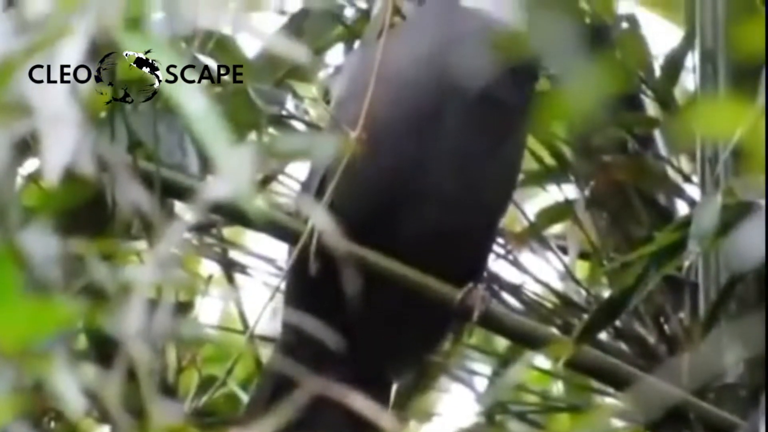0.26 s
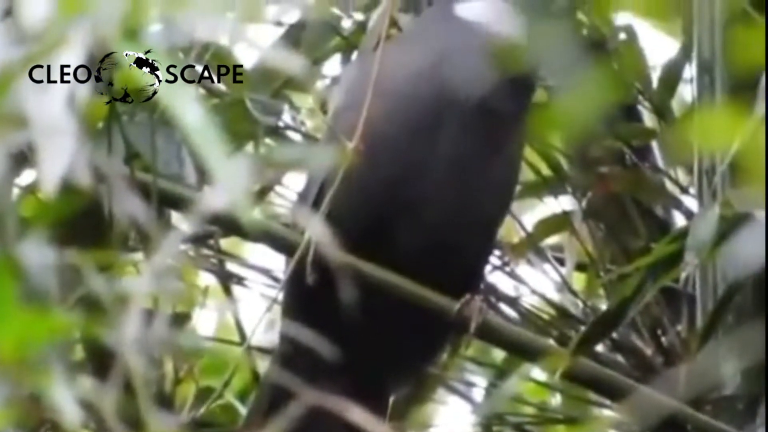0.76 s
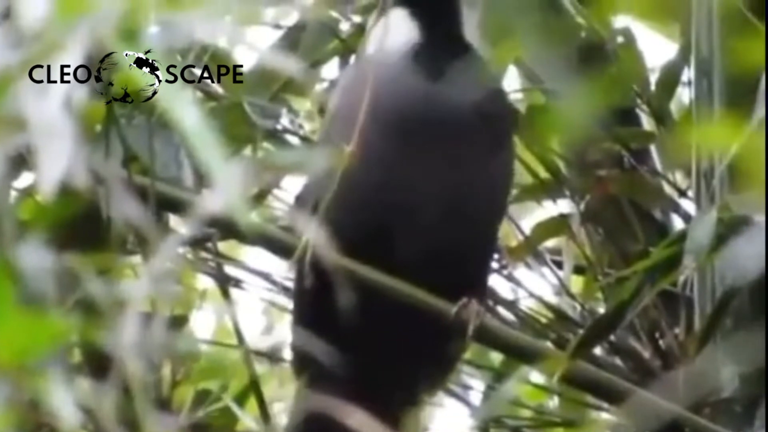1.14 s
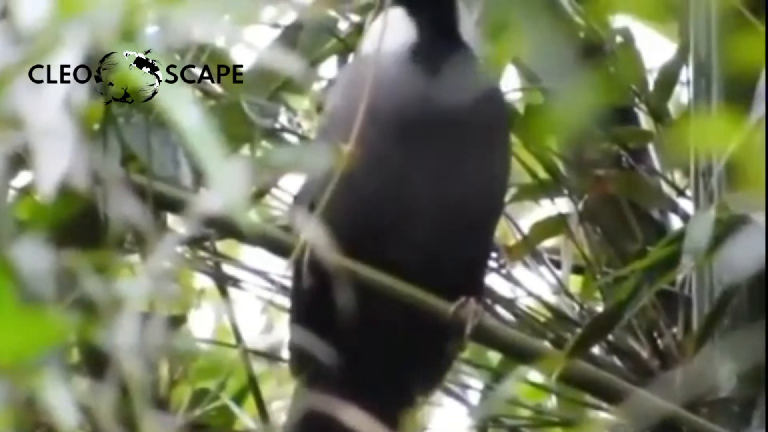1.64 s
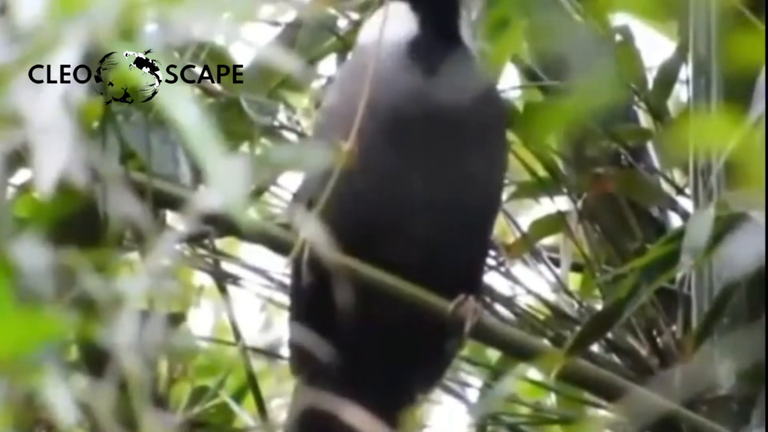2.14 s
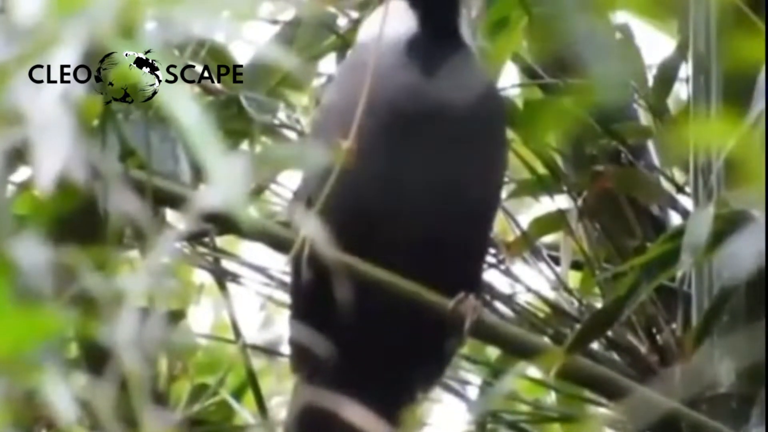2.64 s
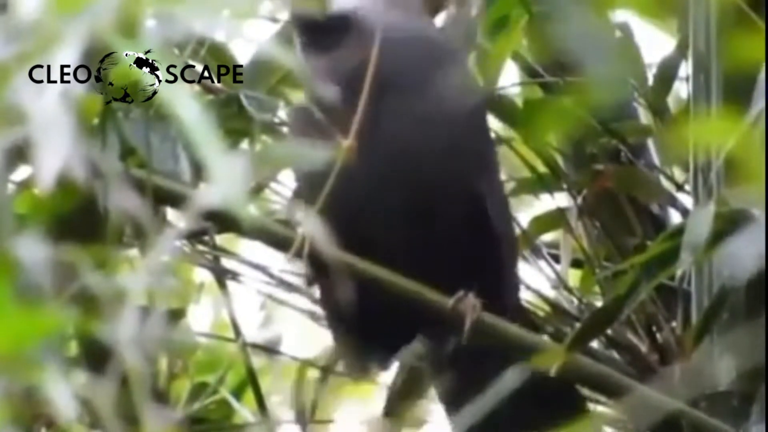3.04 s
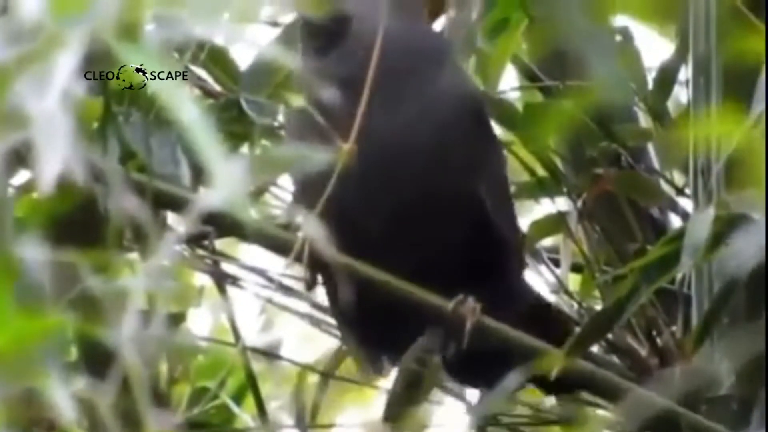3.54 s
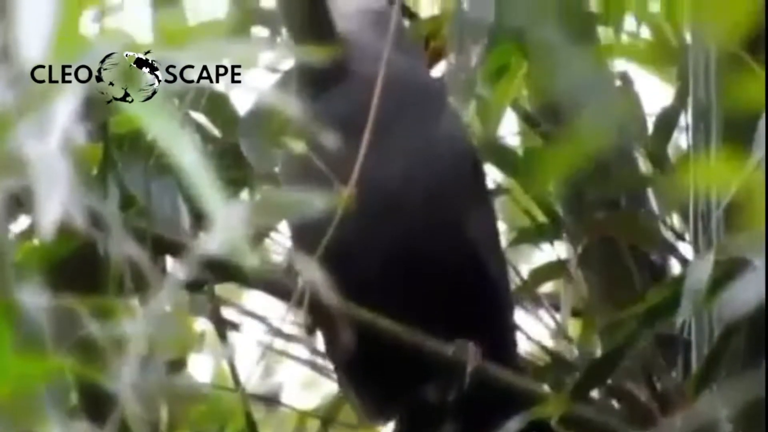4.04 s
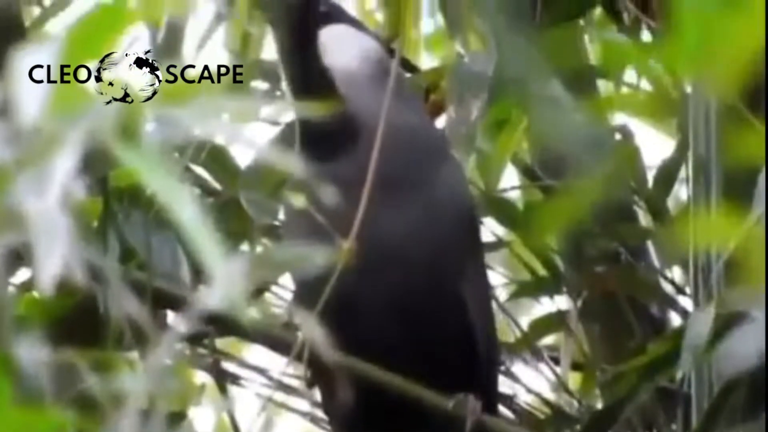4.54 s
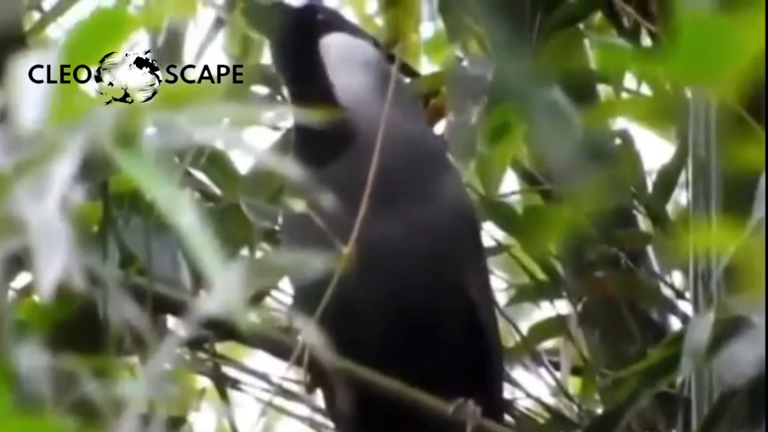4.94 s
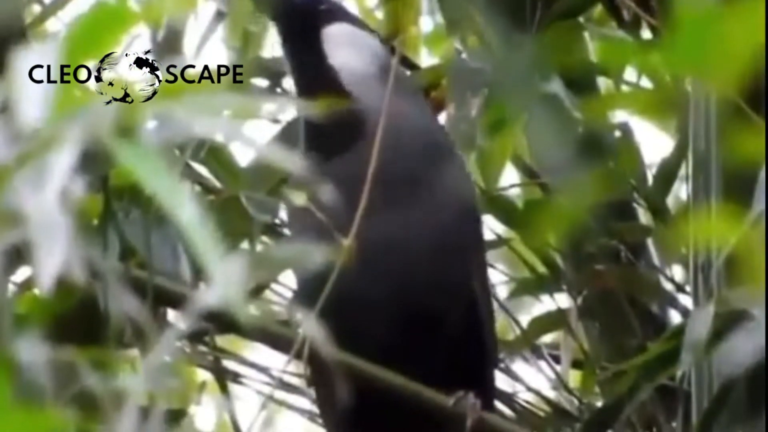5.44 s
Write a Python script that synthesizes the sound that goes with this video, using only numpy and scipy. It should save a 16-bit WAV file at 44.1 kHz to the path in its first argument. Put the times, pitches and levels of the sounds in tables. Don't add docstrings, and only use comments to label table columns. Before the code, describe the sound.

Dense woodland, stereo camera microphone, close song. One strong swooping whistle, a pause, evenly spaced harsh up-and-down chirps, then rapid hollow piping on one pitch that drops as it tires. Scratchy rising notes follow, interleaved with a second bird's steady nasal arches, slightly left or right of centre. Both end in quick overlapping warbles and falls. Tiny far birds, soft traffic rumble and leaf hiss lie beneath.

```python
import sys
import numpy as np
from scipy import signal
from scipy.fft import rfft, irfft
from scipy.io import wavfile
from scipy.ndimage import uniform_filter1d

SR = 44100
rng = np.random.default_rng(int(sys.argv[2]) if len(sys.argv) > 2 else 0)


def to_linear_factor(level_db):
    exponent = np.asarray(level_db, float) / 20
    return 10 ** exponent


def transcribe(u):
    v = np.clip(np.atleast_2d(u).T, -1, 1)
    q = np.round(v * 32767).astype(np.int16)
    wavfile.write(sys.argv[1], SR, q)


N = 250929

# start_s, level_db, pitch_hz, length_s
PIPES = [
    (2.271, -22, 999, 0.032),
    (2.338, -11.5, 998, 0.039),
    (2.414, -11.5, 1000, 0.04),
    (2.493, -12, 1000, 0.041),
    (2.57, -11.5, 1000, 0.04),
    (2.647, -13.5, 988, 0.044),
    (2.731, -12.5, 997, 0.046),
    (2.818, -11.5, 985, 0.037),
    (2.912, -14, 963, 0.0355),
    (3.004, -19, 870, 0.034),
]
# time_s, pitch_hz, level_db
UNDERTONE = [(.1, 1180, -31), (.2, 1316, -25), (.23, 1357, -16.5), (.262, 1335, -28), (.3, 1400, -55)]
# begin_s, crest_s, end_s, rate_hz, depth (0-1)
TRILLS = [
    (4.856, 4.993, 5.06, 48.05, 0.17),
    (5.261, 5.371, 5.45, 47.44, .19),
]
# centre_hz, width_hz, lift_db
THROAT = [(2140, 340, 0), (3730, 113, 7.5), (4820, 2900, -0.5)]
# frequency_hz, level_db
BREATH = [(600, -41), (1000, -7), (2000, -8.5), (4500, -5.5), (7000, -14), (15000, -24)]
# centre_hz, width_hz, lift_db
BREATH_PEAKS = [(2500, 2500, 9.5), (2394, 250, 0), (3760, 770, 12.5), (4200, 250, 6.5), (5800, 880, 11),
                (8300, 680, 12.5), (11850, 1200, 9.5)]
# centre_hz, width_hz, lift_db
BEAK = [(7200, 1200, 22), (13500, 2500, 10)]

# start_s, length_s, low_hz, top_hz, effort_db. The shape stretches to the length.
WHISTLE = [(0, 0.05, -12, -19), (.034, 0.04, -7.5, -14.5), (.094, 0.44, -7.5, 3), (.128, .62, 1, -8),
           (.19, 0.87, 2, -17), (.225, 0.99, -4.5, -7.5), (.26, 0.98, -5.5, -9), (.3, 1, -5.5, -8.5),
           (.326, 0.85, 0, -5.5), (.35, .65, -4, -5), (.39, 0.33, -6, -6), (.422, 0.11, -5.5, -16),
           (.444, .02, -5.5, -10), (.465, 0.01, -19, -32.5)]
WHISTLES = [
    (0.0014, 0.463, 963, 2008, -7),
]
LEAD = [(0, 0.47, -20, -20.5), (.008, .61, -2, -8), (.047, 0.99, 3, 1.5), (.06, 0.78, -4.5, -0.5),
        (.079, .55, 2.5, 4.5), (.101, 0.32, -0.5, -6), (.119, 0.0063, -6.5, -1)]
LEADS = [
    (0.694, .119, 902, 1690, -26),
]
CHAT = [(0, .2, -7, -17), (.008, .42, -2.5, -7.5), (.014, .57, -3, -2), (.028, .76, -5.5, -5),
        (.041, 0.94, 3, -3.5), (.052, .98, 6, -1), (.064, .81, 3, -1.5), (.086, .53, 0, 4),
        (.1, .42, 5, 1.5), (.12, 0.069, 0, -1.5)]
CHATS = [
    (0.909, 0.12, 873, 1654, -27.5),
    (1.128, .12, 867, 1684, -27),
    (1.359, 0.113, 866, 1767, -27.5),
]
LATE_CHAT = [(0, 0.177, -4, -18), (.01, .48, -2, -3), (.023, .82, -1, -7), (.034, 0.99, 0, -12),
             (.046, 0.96, 7, -14), (.058, .8, 2, -5.5), (.069, .57, -2, 3.5), (.079, .47, -0.5, 0.5),
             (.095, 0.33, 1.5, 2.5), (.112, 0.094, -1, -3)]
LATE_CHATS = [
    (1.589, .112, 785, 1800, -26.5),
    (1.811, .1, 756.4, 1804, -26.5),
]
DROP = [(0, 1, -1, -18.5), (.02, 0.79, 4, 0.5), (.046, 0.202, -1, 4), (.064, 0.0085, -11, -6)]
DROPS = [
    (5.138, .056, 1050, 1570, -24),
    (5.539, 0.06, 1053, 1542, -22.5),
]
CHIP = [(0, 0.98, -3, -17), (.006, 0.9, 2, 6.5), (.018, .4, 5.5, 6.5), (.028, 0.0092, 3, -9)]
CHIPS = [
    (4.755, 0.0433, 1144, 1224, -35),
]
HUM = [(0, 0.99, -5, -0.5), (.012, 0.752, -5, 6), (.03, 0.328, -3, 3.5), (.06, .12, 2.5, 0),
       (.082, 0.023, 0, 4.5), (.1, 0.01, -10, -17)]
HUMS = [
    (4.793, 0.1, 940, 1103, -28),
    (5.6, 0.072, 1010, 1070, -37),
]
WARBLE = [(-.015, .01, -20, -28), (.005, 0.03, -3, -7.5), (.05, 0.015, -7.5, -10), (.092, 0.48, -5, -8),
          (.138, .94, -3.5, 5.5), (.16, 0.94, -5, 0), (.18, 0.85, -5, 0)]
WARBLES = [
    (4.864, .195, 950, 1918, -23.5),
]
LATE_WARBLE = [(0, 0.036, -6.5, -17), (.05, 0.0053, -1.5, -14), (.092, 0.41, 1.5, -12.5),
               (.138, .94, -1, 4.5), (.16, 0.96, -8, 5.5), (.18, 0.99, -6.5, -28)]
LATE_WARBLES = [
    (5.258, .185, 1026, 1894, -22.5),
]
# time_s, pitch_hz, fundamental_db, overtone_drive_db
RASPS = [
    [(3.228, 782.5, -44, -41.5), (3.268, 958, -29, -29), (3.33, 1029, -35, -29), (3.378, 1118, -28, -31.5),
     (3.454, 1274, -27.5, -27), (3.492, 1426, -30, -32), (3.506, 1598, -24, -20.5), (3.518, 1826, -39, -33),
     (3.54, 1870, -43, -46)],
    [(3.715, 814.8, -35, -35.5), (3.753, 993, -34, -30), (3.775, 1050, -33, -29.5),
     (3.865, 1185, -28, -28.5), (3.911, 1286, -31.5, -26.5), (3.929, 1383, -26, -29.5),
     (3.962, 1510, -25, -24.5), (3.983, 1940, -25, -42.5), (4.005, 1800, -48, -32)],
    [(4.172, 806, -43, -42), (4.19, 897, -28, -32.5), (4.216, 1046, -30.5, -29.5),
     (4.266, 1138, -33, -33.5), (4.358, 1273, -35.5, -27), (4.398, 1309, -30.5, -27),
     (4.462, 1476, -28, -28.5), (4.482, 1859, -21.5, -32), (4.503, 1745, -36, -39)],
]

# second_db, third_db, fourth_db, breath_db,
# fall_db (per higher partial), spent_db (breath lost over the note)
VOICES = [
    (-25, -52, -36.5, -35, 1.33, -2),
    (5, 5, -8, -1.5, 4.3, -4.5),
    (1, 5, -7.5, 9, 26, 11),
    (9.5, -13.5, -18.5, -13, 4.1, 6),
    (-2, 1.5, -14, -12, 4.6, -14),
    (5, -1, -25.5, 5, 22, 25.5),
    (4.5, -10, -16.5, -11, 6.6, -0.5),
]
# centre_hz, width_hz, lift_db
THROATS = [
    [(2126, 410, 5.5), (3920, 330, 9), (6965, 1000, 15.5)],
    [(2020, 250, 4.5), (3400, 220, -2.5), (3823, 406, 14), (4138, 350, 10.5), (4570, 300, -5),
     (5130, 500, 5), (6600, 530, 0.5)],
    [(2260, 730, 10), (3510, 420, -0.5), (4415, 740, 15.5), (4945, 630, -15), (5520, 820, 18.5),
     (7000, 1140, -20)],
    [(2420, 1000, 1.5), (3890, 280, 7.5), (5740, 910, 6.5)],
    THROAT,
    [(1810, 202, 10), (3720, 850, 6), (5170, 2200, -18)],
    [(1990, 562, 12.5), (2680, 201, 7.5), (3200, 167, 1)],
]
# pitch_hz, width_hz, lift_db
SECOND_BREAKS = [
    [],
    [(1800, 69, -19)],
    [(1470, 440, -4), (1860, 91, 10.5)],
    [],
    [],
    [(1070, 110, 1)],
    [],
]
THIRD_BREAKS = [
    [],
    [(1000, 257, -29)],
    [(860, 200, -3.5), (1202, 170, -19), (1880, 260, -11)],
    [],
    [],
    [(960, 200, -8)],
    [],
]

# time_s, height (0-1), fundamental_db, drive_db
ARCH = [(0, 0.03, -8, 4), (.035, 0.43, -8.5, 7.5), (.07, 0.76, -8, 5.5), (.12, 1, 0, 0),
        (.2, 0.99, -4.5, -3), (.29, .99, -3, -2.5), (.355, 0.94, -6.5, -0.5), (.4, 0.52, -10.5, 4)]
# start_s, length_s, top_hz, effort_db, reed_db
ARCHES = [
    (3.429, .405, 1871, -24, -3),
    (4.035, .385, 1803, -27.5, 6),
]
# second_db, fourth_db
ARCH_VOICE = (-5, -6)
# time_s, pitch_hz, fundamental_db, fourth_db
ANSWERS = [
    [(4.713, 979, -32.5, -62), (4.765, 1045, -21, -49), (4.8, 993, -26, -45), (4.835, 820, -35.5, -50),
     (4.9, 590, -44, -65)],
    [(5.113, 1860, -19, -49), (5.14, 1744, -18.5, -34.5), (5.167, 1675, -15, -48), (5.2, 1685, -21, -28.5),
     (5.245, 1843, -20.5, -35), (5.262, 1594, -20.5, -25), (5.283, 1075, -19.5, -75),
     (5.311, 970, -31, -62)],
    [(5.345, 1000, -29, -61), (5.4, 1318, -18, -61), (5.44, 1310, -31, -74)],
    [(5.604, 1840, -22, -52), (5.621, 1765, -20, -29), (5.638, 1539, -12, -58), (5.66, 1470, -22, -34),
     (5.69, 1150, -16, -53)],
]
ANSWER_UNDER_DB = [-26, -30.5, -36, -43]
# centre_hz, width_hz, lift_db
MATE_THROAT = [(7300, 1300, 18), (9200, 1500, 17)]
# frequency_hz, lead_radians
MATE_LEAD = [(1000, 0), (1850, -0.52), (3700, 0.59), (5500, 0.94), (7300, 0.093), (9200, -0.85)]
# frequency_hz, left_minus_right_db
MATE_LEFT = [(1000, -2.5), (1850, -6.5), (3700, -0.5), (5500, -4), (7300, 0), (9200, -3.5)]
# frequency_hz, level_db
MATE_SPREAD = [(1000, -12), (4000, 4.5), (8000, 4.5)]

# frequency_hz, t60_s
LEAVES = [(800, 0.19), (2000, 0.27), (4000, 0.19), (9000, 0.33)]
# start_s, length_s, from_hz, to_hz, level_db
DISTANT = [
    (1.953, 0.048, 3850, 3570, -38),
    (2.137, 0.06, 2955, 2770, -46.5),
    (2.21, 0.092, 3490, 2923, -51),
    (2.99, 0.05, 4180, 4050, -50),
    (3.084, 0.13, 4070, 4000, -60),
]
# frequency_hz, level_db (per Hz)
WOOD = [(20, -55), (40, -50), (62, 4), (100, 1), (135, -1), (200, -11.5), (270, -16.5), (450, -20.5),
        (1000, -18), (1800, -20.5), (4000, -23.5), (8000, -30), (14500, -41.5), (15700, -40)]
# frequency_hz, likeness (-1 to 1)
WOOD_SAME = [(60, 0.92), (150, 0.96), (380, 0.73), (950, 0.83), (2380, 0.78), (5980, -0.088),
             (15000, -0.48)]
# frequency_hz, left_minus_right_db
WOOD_LEFT = [(60, -2), (240, -2), (950, -3.5), (3770, -1), (15000, -0.5)]


def near_bird():
    tone, air = np.zeros(N), np.zeros(N)
    for rows, kind in song():
        near_note(tone, air, rows, kind)
    pipes(tone)
    undertone(tone)
    airway = lambda hz: evened(to_linear_factor(read(BREATH, hz) + peaks_db(BREATH_PEAKS, hz)))
    return tone + patchy(coloured(air * rng.standard_normal(N), airway))


def song():
    kinds = [(WHISTLE, WHISTLES, 0), (CHAT, CHATS, 1), (DROP, DROPS, 3), (CHIP, CHIPS, 4), (HUM, HUMS, 5),
             (WARBLE, WARBLES, 6), (LATE_WARBLE, LATE_WARBLES, 6), (LEAD, LEADS, 1), (LATE_CHAT, LATE_CHATS, 1)]
    notes = [(shaped(shape, *note), kind) for shape, events, kind in kinds for note in events]
    return notes + [(rows, 2) for rows in RASPS]


def near_note(tone, air, rows, kind):
    (*over_db, fall_db, spent_db), throat = VOICES[kind], THROATS[kind]
    t, (hz, first_db, drive_db), edge = spread(rows)
    second_db, third_db, fourth_db, breath_db = (drive_db + db for db in over_db)
    second_db = second_db + peaks_db(SECOND_BREAKS[kind], hz)
    third_db = third_db + peaks_db(THIRD_BREAKS[kind], hz)
    breath_db = breath_db - spent_db * np.linspace(0, 1, len(t))
    rasp = np.clip(to_linear_factor(breath_db + 21), 0, 1)
    trill = trill_wobble(t)

    octave_db = np.interp(hz, [1620, 1800], [-40, 30]) * trill
    hz = hz * (1 + trill + (.002 + .018 * rasp ** 1.5) * unsteady(len(t), span=60))
    low_db = [first_db + 50 * trill, second_db + octave_db, third_db - 60 * abs(trill)]
    upper_db = [np.maximum(fourth_db - fall_db * k, first_db - 67 + peaks_db(BEAK, (k + 4) * hz))
                for k in range(8)]
    levels_db = low_db + upper_db
    for k in range(6):
        flutter = unsteady(len(t), span=220) + rasp * unsteady(len(t), span=900)
        levels_db[k] = levels_db[k] + 5 * (rasp + 6 * abs(trill)) * np.minimum(flutter, .7)
    shake_db = (1 + rasp) * unsteady(len(t), span=100)
    add(tone, t[0], edge * partials(hz, levels_db, throat) * to_linear_factor(shake_db))

    halves_db = [breath_db - 9 - 90 * (k % 2 or k == 0) + 5 * unsteady(len(t), span=90) for k in range(10)]
    add(tone, t[0], edge * rasp * partials(hz / 2, halves_db, THROAT))

    puffs = 1 + 0.11 * np.cos(2 * np.pi * np.cumsum(hz) / SR)
    rise = np.minimum((t - t[0]) / .012, 1)
    soft_edge = uniform_filter1d(edge, size=700, mode="constant") ** 2
    add(air, t[0], soft_edge * rise * puffs * to_linear_factor(breath_db + 1.2 * unsteady(len(t), span=120)))


def trill_wobble(t):
    wobble = np.zeros(len(t))
    for begin, crest, end, rate, depth in TRILLS:
        swell = np.interp(t, [begin, crest - .04, end - .04, end], [0.196, 0.89, 0.57, 0.022]) ** 2
        cycle = 2 * abs(np.cos(np.pi * rate * (t - crest)))
        middle = np.interp(t, [crest - .04, crest + 0.00986], [1.1, 1.75])
        wobble += depth * swell * (cycle - middle)
    return uniform_filter1d(wobble, size=130)


def pipes(tone):
    for s, db, hz, length in PIPES:
        u = np.arange(0, 1, 1 / (length * SR))
        sag = 0.49 * (PIPES[0][2] - hz) * (u - .5)
        arch = hz * (1.03 - 0.35 * (u - .55) ** 2) - sag
        levels_db = [db, db - 32.5, db - 33.5, db - 53]
        add(tone, s - .006, np.sin(np.pi * u) ** 0.95 * partials(arch, levels_db, THROAT))


def undertone(tone):
    t, (hz, db), edge = spread(UNDERTONE)
    add(tone, t[0], edge * partials(hz, [db], []))


def patchy(x):
    z = signal.stft(x, nperseg=256)[2]
    patches = uniform_filter1d(rng.standard_normal(z.shape), size=3, axis=0)
    patches = evened(uniform_filter1d(patches, size=9, axis=1))
    return signal.istft(z * to_linear_factor(4.5 * (patches - 0.5)), nperseg=256)[1][:N]


def mate():
    out = np.zeros(N)
    for s, length, hz, db, reed_db in ARCHES:
        mate_note(out, shaped(ARCH, s, length, 0.79 * hz, hz, db, reed_db))
    for rows, under_db in zip(ANSWERS, ANSWER_UNDER_DB):
        mate_note(out, rows, under_db)
    return out


def mate_note(out, rows, under_db=None):
    t, (hz, first_db, drive_db), edge = spread(rows)
    if under_db:
        second_db, fourth_db = first_db + under_db, drive_db
        third_db, reed_fall_db = second_db - 12, 3
    else:
        second_db, fourth_db = (drive_db + db for db in ARCH_VOICE)
        below_top, late = 1 - hz / hz.max(), t > t.mean()
        second_db = second_db + 0.65 * (first_db - first_db.max()) - 150 * below_top * np.where(late, 1, .3)
        fourth_db = fourth_db - np.where(late, 40, 95) * below_top
        third_db, reed_fall_db = second_db + 1.5, 0
    hz = hz * (1 + 0.0052 * unsteady(len(t), span=120))
    levels_db = [db + 3.5 * np.minimum(unsteady(len(t), span=300), .7)
                 for db in (first_db, second_db, third_db)]
    levels_db += [fourth_db - db - k * reed_fall_db for k, db in enumerate((11.8, 14.6, 16.8, 56, 43))]
    shake_db = 2.47 * unsteady(len(t), span=200)
    add(out, t[0], edge * partials(hz, levels_db, MATE_THROAT) * to_linear_factor(shake_db))


def aside(x):
    half = lambda hz: to_linear_factor(read(MATE_LEFT, hz) / 2) * np.exp(.5j * read(MATE_LEAD, hz))
    return np.array([coloured(x, half), coloured(x, lambda hz: 1 / half(hz))])


def foliage(x, tail_db, stretch=1):
    taps = np.zeros(SR)
    at = np.arange(200, SR - 20, 20)
    taps[at + rng.integers(0, 20, at.shape)] = rng.choice([-1., 1.], at.shape)
    hz, t, z = signal.stft(taps, SR, nperseg=256)
    decay = to_linear_factor(-60 * t / stretch / read(LEAVES, hz)[:, None])
    buildup = 1 - .7 * np.exp(-t / .02)
    tail = signal.istft(z * decay * buildup, SR, nperseg=256)[1]
    tail = to_linear_factor(tail_db) * tail / np.linalg.norm(tail)
    return signal.fftconvolve(x, tail)[:N]


def distant_birds():
    out = np.zeros(N)
    for s, length, from_hz, to_hz, db in DISTANT:
        u = np.arange(0, 1, 1 / (length * SR))
        hz = (from_hz + (to_hz - from_hz) * u) * (1 + 0.0262 * unsteady(len(u), span=250))
        level_db = db + 3.3 * unsteady(len(u), span=200)
        add(out, s, np.sin(np.pi * u) * partials(hz, [level_db], []))
    return to_linear_factor(4) * out + foliage(out, tail_db=7.5)


def wood():
    frames, hz = N // 256 + 5, np.fft.rfftfreq(1024, 1 / SR)
    a, b, c, d, patches = rng.standard_normal((frames, 513, 5)).T
    patches = evened(uniform_filter1d(uniform_filter1d(patches, size=12, axis=0), size=14, axis=1))
    same = np.clip(read(WOOD_SAME, hz), -1, 1)[:, None]
    tilt = to_linear_factor(read(WOOD_LEFT, hz) / 2)[:, None]
    left = a + 1j * b
    right = same * left + np.sqrt(1 - same ** 2) * (c + 1j * d)
    z = np.array([left * tilt, right / tilt])
    z *= to_linear_factor(read(WOOD, hz)[:, None] + 0.81 * patches)
    return to_linear_factor(-32.5) * evened(signal.istft(z, nperseg=1024, noverlap=768)[1][:, :N])


def shaped(shape, start, length, low_hz, top_hz, effort_db, extra_db=0):
    s, height, first_db, drive_db = np.transpose(shape)
    s = np.maximum.accumulate(s - s[0]) / (s[-1] - s[0])
    hz = low_hz + (top_hz - low_hz) * height
    return np.transpose([start + length * s, hz, effort_db + first_db, effort_db + extra_db + drive_db])


def spread(rows):
    s, *columns = np.transpose(rows)
    t = np.arange(s[0], s[-1], 1 / SR)
    attack_s, release_s = 0.0025, 0.0014
    edge = np.clip(np.minimum((t - t[0]) / attack_s, (t[-1] - t) / release_s), 0, 1)
    return t, [uniform_filter1d(np.interp(t, s, c), size=300, mode="nearest") for c in columns], edge


def partials(hz, levels_db, throat):
    turns = 2 * np.pi * np.cumsum(hz) / SR
    total = 0
    for k, db in enumerate(levels_db, 1):
        audible = k * hz < SR / 2.5
        total = total + to_linear_factor(db + peaks_db(throat, k * hz)) * np.sin(k * turns) * audible
    return np.sqrt(2) * total


def peaks_db(modes, hz):
    return sum(db / (1 + (2 * (hz - f) / width) ** 2) for f, width, db in modes)


def unsteady(length, span):
    return evened(uniform_filter1d(uniform_filter1d(rng.standard_normal(length), span), span))


def coloured(x, gain):
    return irfft(rfft(x) * gain(np.fft.rfftfreq(N, 1 / SR)), N)


def read(points, hz):
    f, value = np.transpose(points)
    return np.interp(np.log(hz + 1), np.log(f + 1), value)


def evened(x):
    return x / np.sqrt(np.mean(x ** 2) + 1e-20)


def add(mix, s, sound):
    part = mix[max(round(s * SR), 0):][:len(sound)]
    part += sound[:len(part)]


def scene():
    near, far = near_bird(), mate()
    far_tail = foliage(far, tail_db=-5)
    far_sides = foliage(coloured(far, lambda hz: to_linear_factor(read(MATE_SPREAD, hz))), tail_db=-9)
    far_tail = far_tail + far_sides * np.array([[1], [-1]])
    sway = 2 * np.pi * np.arange(N) / SR / 1.279
    near_tail = foliage(near * np.cos(sway), tail_db=-5.5) + foliage(near * np.sin(sway), tail_db=-6.5)
    near_tail += foliage(near, tail_db=-12, stretch=2.32)
    floor = coloured(wood(), lambda hz: hz ** 2 / (hz ** 2 + 32.9 ** 2))
    return near + near_tail + aside(far) + far_tail + floor + distant_birds()


def top_cut(x):
    return signal.sosfilt(signal.butter(12, 15870, fs=SR, output="sos"), x)


def record(dry):
    mix = np.clip(dry - .0056, -.99, .99)
    return top_cut(mix)


dry = scene()
out = record(dry)
transcribe(out)
```